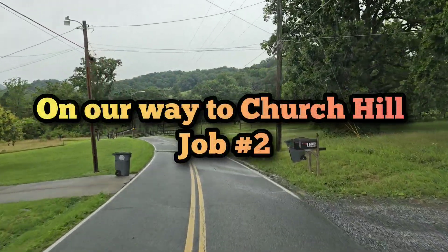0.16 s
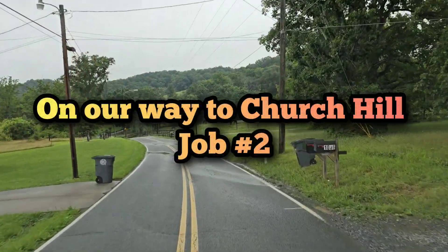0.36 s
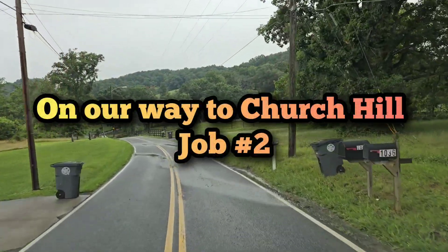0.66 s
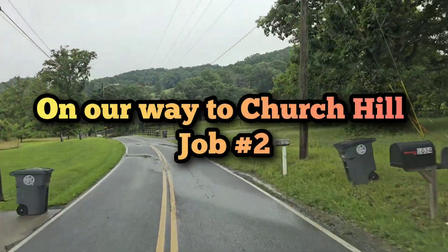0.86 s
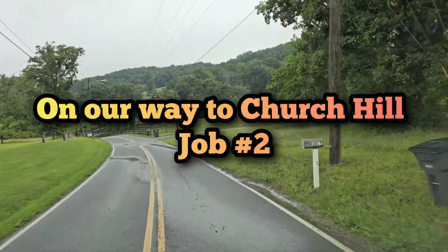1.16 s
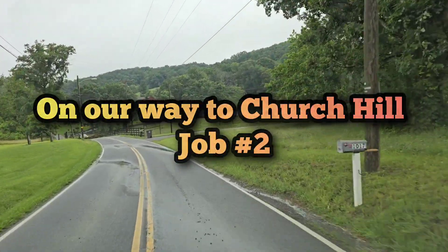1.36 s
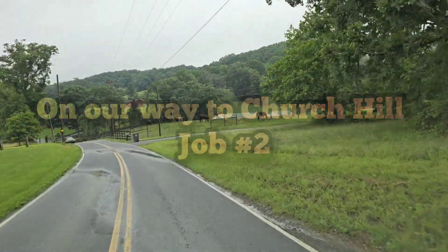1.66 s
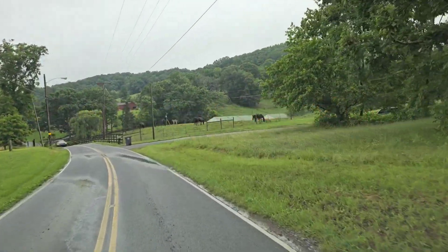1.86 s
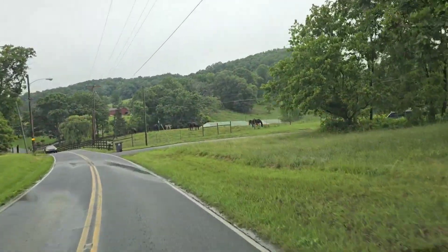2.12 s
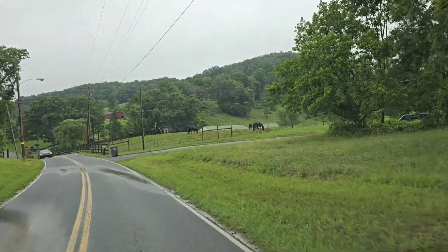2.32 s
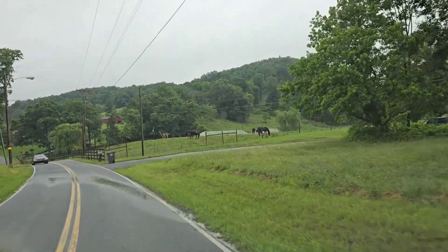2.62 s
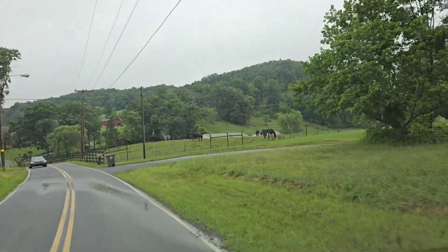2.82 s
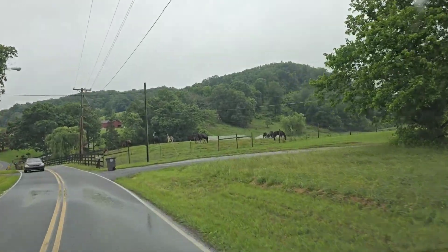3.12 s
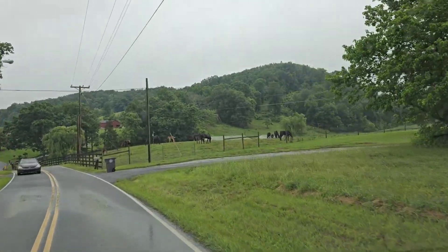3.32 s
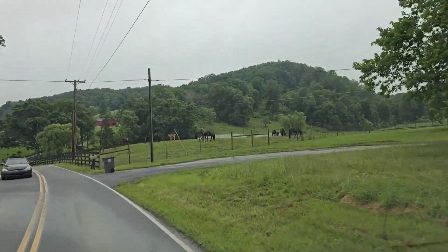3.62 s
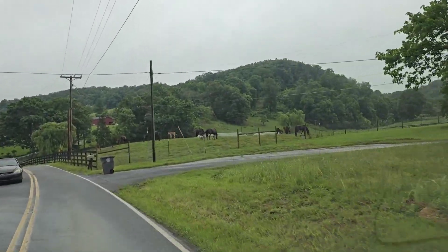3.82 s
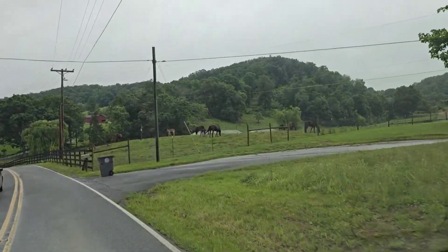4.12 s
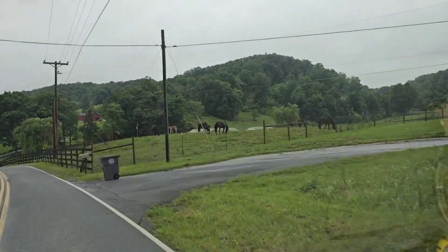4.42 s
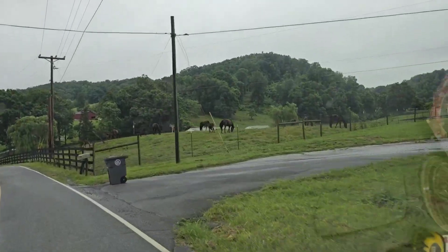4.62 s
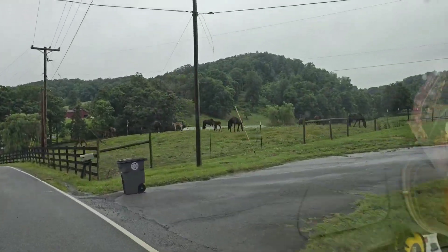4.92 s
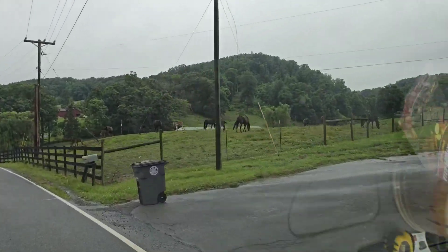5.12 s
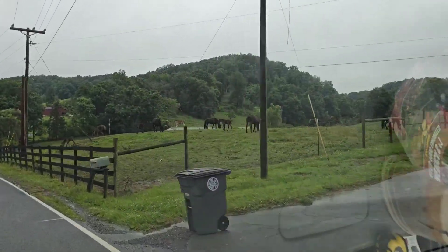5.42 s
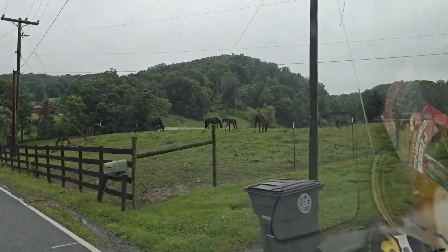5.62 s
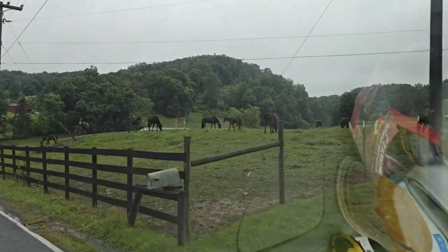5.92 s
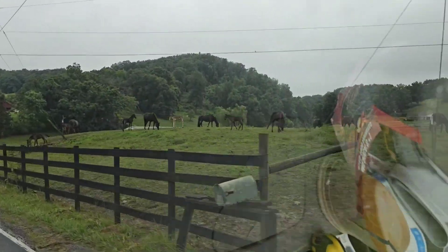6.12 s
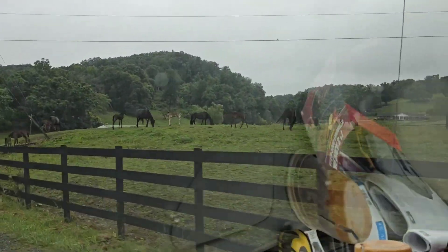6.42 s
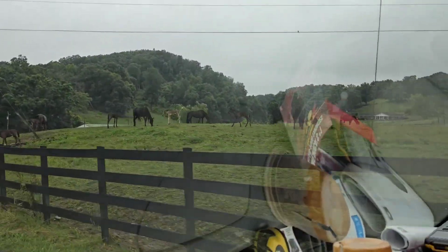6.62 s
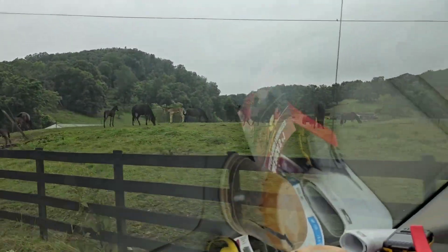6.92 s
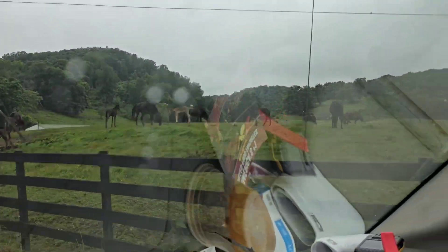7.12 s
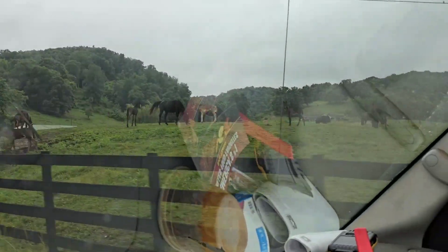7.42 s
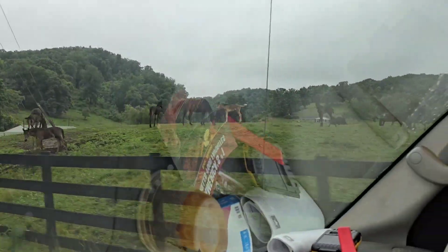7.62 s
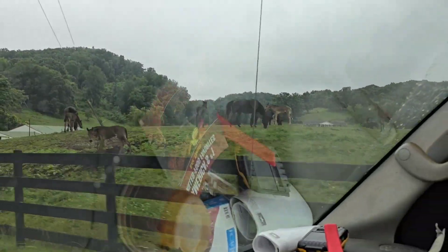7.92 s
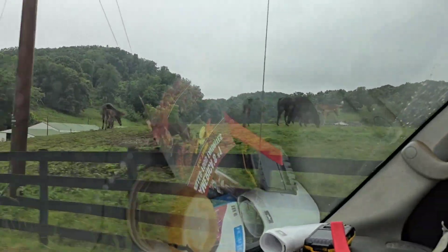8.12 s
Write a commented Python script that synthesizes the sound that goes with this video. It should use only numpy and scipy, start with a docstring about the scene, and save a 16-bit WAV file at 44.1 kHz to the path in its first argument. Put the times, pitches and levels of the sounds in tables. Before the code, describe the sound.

Inside a work truck on a damp road, a very deep boom and steady tyre rumble fill the cab. Bumps come thick at first, with a hard knock and rattle around one second. The middle is calmer, with wet tyre hiss swelling. Ticks return later, then another heavy jolt with knocks near seven seconds. The microphone is close, inside the cab, turning toward the side window.

```python
"""A deep boom fills the cab of a work truck rolling along a damp country road, swelling at each bump.
The tyres rumble and roar through the floor and hiss over wet patches: all are shaped noise.
Loose gear and trim knock, tick, clack, rattle and squeak: noise with quick fades or narrow pitches.
The hollow dashboard answers hard landings with short, fading sine tones."""
import sys
import numpy as np
from scipy import signal
from scipy.fft import rfft, irfft
from scipy.io import wavfile
from scipy.ndimage import uniform_filter1d

SR = 44100
rng = np.random.default_rng(int(sys.argv[2]) if len(sys.argv) > 2 else 0)


def unload_wav(signal):
    """Save mono or channel-first audio to the path in sys.argv[1] as 16-bit WAV at rate SR, clipped to [-1, 1]."""
    wavfile.write(
        sys.argv[1],
        SR,
        np.round(np.clip(np.atleast_2d(signal).T, -1, 1) * 32767).astype(np.int16),
    )


N = 364266
TIME = np.arange(N) / SR
FREQS = np.maximum(np.fft.rfftfreq(N, 1 / SR), 1)   # Hz, kept above zero

# The wheels meet a bump or dip; each layer later shifts its own level.
# Each row: time of the height in seconds, boom level in dB, floor thud level in dB, length in seconds.
BUMPS = [(0.048, -14, -28, 0.054), (0.163, -12, -27, 0.027), (0.265, -8, -25, 0.026),
         (0.434, -11.5, -29, 0.1), (0.567, -10, -29, .04), (0.639, -10, -27, 0.046),
         (0.73, -7.5, -23.5, 0.059), (0.983, -5.5, -22, 0.068), (1.086, -5.5, -29, 0.045),
         (1.183, -8.5, -27, 0.12), (1.732, -14, -25, 0.029), (1.814, -15, -42, 0.022),
         (1.905, -11.5, -35, 0.026), (2.117, -7.5, -30.5, 0.049), (2.208, -11.5, -36, 0.04),
         (2.343, -11, -41, 0.052), (2.558, -18, -30, 0.14), (2.666, -19, -35, 0.034),
         (3.446, -17, -49, 0.027), (3.538, -15.5, -25.5, 0.022), (3.66, -14.5, -33.5, 0.08),
         (4.658, -18, -31, 0.037), (4.956, -16, -42, 0.1), (5.286, -17.5, -37, 0.053),
         (5.757, -9.5, -29, 0.04), (6.081, -13, -31, 0.021), (6.562, -12.5, -26.5, 0.023),
         (6.65, -11, -29, 0.025), (6.761, -13, -35, 0.029), (6.862, -14.5, -28, 0.057),
         (6.954, -1.5, -37, 0.028), (7.091, -6, -43, 0.022), (7.22, -9.5, -24, 0.037),
         (7.437, -15, -36, 0.088), (7.605, -18, -32, 0.059), (7.918, -13.5, -44, 0.026)]
# The microphone swings from the road ahead to the side window.
# Each row: time in seconds, left minus right in dB in the midrange.
HEADING = [(0.0, -5), (4.3, -5.5), (5.9, -1), (8.26, -0.5)]


def from_db(db):
    """Turn decibels into gain."""
    return 10 ** (np.asarray(db) / 20)


def rms_one(x):
    """Scale a sound to an average power of 1."""
    return x / np.sqrt(np.mean(x ** 2) + 1e-20)


def in_time(rows):
    """Draw straight lines between the rows and read each column at every sample."""
    s, *columns = np.transpose(rows)
    return [np.interp(TIME, s, column) for column in columns]


def over_hz(points):
    """Read a curve at every frequency, joining its points on a log pitch axis."""
    hz, value = np.transpose(points)
    return np.interp(np.log(FREQS), np.log(hz), value)


def colour(points):
    """Gain of a tone colour that falls away steeply beyond its end points."""
    skirts = np.minimum(FREQS / points[0][0], 1) * np.minimum(points[-1][0] / FREQS, 1)
    return from_db(over_hz(points)) * skirts ** 2


def resonance(hz, width_hz):
    """Gain of a resonance: 1 at its pitch, about half at the edges of its width."""
    return 1 / (1 + ((FREQS ** 2 - hz ** 2) / (FREQS * width_hz)) ** 2)


def lifted(modes):
    """Gain of a flat response with resonances standing out of it."""
    return 1 + sum((from_db(db) - 1) * resonance(hz, width) for hz, width, db in modes)


def filtered(x, gain):
    """Apply a gain to every frequency of a sound."""
    return irfft(rfft(x) * gain, N)


def drift(rate_hz):
    """Random wandering with a spread of 1, smooth above the given rate."""
    return rms_one(filtered(rng.standard_normal(N), 1 / (1 + (FREQS / rate_hz) ** 2)))


def swells(rows):
    """Smooth rises and falls (middle in s, dB, length in s), added in power."""
    power = 0
    for s, db, length in rows:
        distance = (2 * (TIME - s) / length) ** 2
        power = power + from_db(2 * db) * np.exp(-np.minimum(distance, 20))
    return np.sqrt(power)


def pan(left_db):
    """Gains of the two channels for a given left minus right in dB."""
    return from_db(np.array([[1], [-1]]) * left_db / 2)


def cab_noise(gain):
    """Noise filling the cab: long waves reach both sides alike, short ones do not."""
    # Likeness of left and right. Each row: frequency in Hz, correlation from -1 to 1.
    likeness = [(25, .997), (45, .997), (70, .98), (160, .96), (270, .82), (450, .62), (740, .14),
                (1220, -.2), (2000, -.03), (15000, 0)]
    alike = np.clip(over_hz(likeness), -1, 1)
    mid, side = rfft(rng.standard_normal((2, N))) * gain
    mid, side = mid * np.sqrt(1 + alike), side * np.sqrt(1 - alike)
    return rms_one(irfft(np.array([mid + side, mid - side]), N))


def steadied(x, span_s):
    """Even out the chance swells of a narrow noise."""
    power = uniform_filter1d(np.mean(x ** 2, axis=0), max(int(span_s * SR), 1), mode="wrap")
    return x / np.sqrt(power + 1e-6)


def boom(bump_db, left_db, top_hz):
    """Engine and suspension shake the lowest modes of the cab; above top_hz little remains."""
    # Unevenness between bumps. Each row: time in seconds, boom level in dB around which it sways.
    ride_rows = [(0.0, -19), (1.2, -24.5), (1.35, -16), (1.55, -27), (1.9, -24.5), (2.4, -21),
                 (2.85, -20.5), (3.1, -23.5), (3.95, -24.5), (4.4, -24), (4.8, -21.5), (5.5, -22),
                 (6.0, -23), (6.45, -27.5), (6.7, -22), (7.2, -18.5), (7.7, -25.5), (8.1, -18.5)]
    # Air and body modes of the cab. Each row: pitch in Hz, width in Hz, relative level in dB.
    cab_modes = [(18.9, 17, -21.5), (32.8, 7.2, -5), (41, 4.4, -5), (47.8, 23.7, -11.5)]
    ride_db, = in_time(ride_rows)
    ride = from_db(ride_db + 2.5 * drift(rate_hz=6))   # chance sway with a spread of 2.5 dB
    jolts = swells((s, db + bump_db, length) for s, db, _, length in BUMPS)
    modes = sum(from_db(db) * resonance(hz, width) for hz, width, db in cab_modes)
    shaken = np.hypot(ride, jolts) * steadied(cab_noise(modes), span_s=.08)
    inertia = 1 / np.sqrt(1 + (FREQS / top_hz) ** 10)
    return filtered(shaken, inertia) * pan(left_db)


def road(rumble_db, roar_db, flutter_db, thud_db, thud_hz):
    """Road texture rumbles through the floor and roars higher from the tread; bumps add deeper thuds."""
    # Roughness. Each row: time in seconds, floor rumble in dB, tread roar in dB (shifted below).
    roughness = [(0.0, -28, -42.5), (0.76, -30.5, -42.5), (1.1, -23.5, -40), (1.27, -28.5, -44),
                 (1.59, -29.5, -44.5), (2.14, -29.5, -44.5), (3.11, -33, -47.5), (3.55, -35, -45.5),
                 (4.6, -33.5, -46.5), (4.9, -31, -43), (5.38, -34.5, -44.5), (5.89, -31, -42),
                 (6.33, -30, -42.5), (6.8, -30.5, -43), (7.13, -27, -39.5), (7.52, -32, -44),
                 (8.26, -34, -43.5)]
    # Tone colours. Each row: frequency in Hz, relative level in dB per Hz.
    rumble_colour = [(42, -19), (58, 1), (74, 0), (88, -2.5), (96, -5.5), (130, -12), (150, -9),
                     (205, -13.5), (238, -10.5), (275, -15), (330, -31.5), (520, -43.5)]
    roar_colour = [(200, -3), (310, 2.5), (400, -0.5), (490, -2.5), (620, -7), (780, -6), (870, -10.5),
                   (1000, -12.5), (1400, -13.5), (2200, -23.5), (5000, -43)]
    floor_db, tread_db = in_time(roughness)
    floor_gain = colour(rumble_colour)
    rumble = from_db(floor_db + rumble_db) * steadied(cab_noise(floor_gain), span_s=.12)
    roar = from_db(tread_db + roar_db) * cab_noise(colour(roar_colour))
    jolts = swells((s, db + thud_db, length) for s, _, db, length in BUMPS)
    deeper = floor_gain / np.hypot(1, FREQS / thud_hz)
    thuds = jolts * steadied(cab_noise(deeper), span_s=0.062)
    flutter = from_db(flutter_db * drift(rate_hz=6.5))
    return flutter * (rumble * pan(left_db=0.5) + roar * pan(left_db=2.5)) + thuds


def wet_tyres(hiss_db, spray_db, puddle_db, splash_db, patter_db):
    """Water squeezed from the tread hisses, drops spray against the wheel arches; puddles swell both."""
    # Wetness. Each row: time in seconds, tyre hiss level in dB (shifted below).
    wetness = [(0.0, -60), (1.17, -64.5), (1.47, -65), (2.57, -58.5), (3.26, -64.5), (3.86, -62),
               (4.3, -56.5), (5.06, -58), (6.1, -60.5), (6.74, -63), (6.83, -64.5), (7.55, -64.5),
               (8.26, -60.5)]
    # Wetter patches. Each row: middle in seconds, level in dB (shifted below), length in seconds.
    puddle_rows = [(.27, -48, 0.11), (2.0, -48, 0.17), (2.5, -48.5, 0.19), (5.0, -43.5, 0.25)]
    # Tone colours. Each row: frequency in Hz, relative level in dB per Hz.
    hiss_colour = [(500, -7.5), (1000, -3.5), (2000, -1.5), (2650, -2.5), (3200, -1), (4600, -4),
                   (5800, -13.5), (8000, -23), (16000, -37)]
    spray_colour = [(3000, -1), (5500, -4.5), (7200, 1), (10000, -2.5), (11100, -2), (11800, 4),
                    (12800, -0.5), (15800, 1.5)]
    wet_db, = in_time(wetness)
    puddles = swells(puddle_rows)
    hiss_level = np.hypot(from_db(wet_db + hiss_db), from_db(puddle_db) * puddles)
    spray_level = np.hypot(from_db(wet_db + spray_db), from_db(splash_db) * puddles)
    hiss = hiss_level * cab_noise(colour(hiss_colour)) * pan(left_db=-1.5)
    spray = spray_level * cab_noise(colour(spray_colour))
    return (hiss + spray) * from_db(patter_db * drift(rate_hz=28))


def random_contacts(per_s, range_db, fade):
    """Contacts at chance moments, up to range_db weaker than the strongest; fade is kept per sample."""
    chance, size = rng.random((2, N))
    contacts = (chance < per_s / SR) * from_db(-range_db * size)
    return signal.lfilter([1], [1, -fade], contacts + 1e-18)


def rattle(size_db):
    """Small things jiggle on the dashboard: quick uneven contacts of very different strength."""
    # Each row: time of the height in seconds, level in dB, length in seconds.
    rattle_rows = [(.45, -66, 0.88), (.99, -40, 0.098), (1.13, -42, 0.15), (6.78, -45, 0.14),
                   (7.115, -42.5, 0.16), (7.33, -46, 0.26)]
    # Tone colour. Each row: frequency in Hz, relative level in dB.
    rattle_colour = [(1000, 2), (2100, 1), (3800, 2), (5200, -10), (6500, -19), (10000, -13), (12000, -7),
                     (15800, -12)]
    fade = from_db(-60 / (.06 * SR))   # each contact falls by 60 dB in 0.06 s
    rings = random_contacts(130, size_db, fade)
    return swells(rattle_rows) * rings * cab_noise(colour(rattle_colour)) * pan(left_db=-4.0)


def chatter(grain):
    """A landing breaks up into uneven contacts; grain is the share of power in them."""
    contact_s = .0018   # time in which a contact fades to about a third
    bursts = rms_one(random_contacts(330, 10, np.exp(-1 / (contact_s * SR))))
    share = np.clip(grain, 0, 1)
    return np.sqrt(1 - share + share * bursts ** 2)


def blows(rows, gain, crack_db, grain):
    """A loose part lands with a brief crack and chatters; its dense modes die away in the cab."""
    rise_share, crack_s = .014, .003   # build-up as a share of ring time; crack fade in seconds
    envelope = np.zeros((2, N))
    for s, db, t60, left_db in rows:
        start = int(s * SR)
        age = np.maximum(TIME[start:][:SR] - s, 0)
        rise = 1 - np.exp(-age / (rise_share * t60))   # short rings build up fastest
        crack = from_db(crack_db) * np.exp(-age / crack_s)
        fading = from_db(db - 60 * age / t60)
        envelope[:, start:][:, :SR] += fading * (rise + crack) * pan(left_db)
    return envelope * chatter(grain) * cab_noise(gain)


def thumps(level_db):
    """Body panels thump dully: fading low noise without separate contacts."""
    # Each row: start in seconds, level in dB before level_db, time to fade by 60 dB in seconds,
    # left minus right in dB.
    thump_rows = [(.045, -36, 0.2, 2), (.185, -37, 0.32, -1), (.468, -35, 0.26, 1), (1.016, -28, 0.22, -1),
                  (1.160, -35, 0.16, -1), (1.53, -45, 0.2, 4), (3.56, -43.5, 0.35, 1), (5.0, -38, .2, 1),
                  (7.142, -38, 0.1, 1)]
    # Tone colour. Each row: frequency in Hz, relative level in dB.
    thump_colour = [(220, -5.5), (420, 1), (530, -5), (660, -9), (780, -7), (950, -36)]
    return blows(thump_rows, colour(thump_colour), crack_db=-16, grain=0) * from_db(level_db)


def squeaks(level_db, slip_db):
    """Plastic trim rubs: uneven slips excite one narrow resonance for the length of each rub."""
    # Each row: start in seconds, level in dB before level_db, length in seconds, pitch in Hz,
    # width in Hz, left minus right in dB.
    squeak_rows = [(0.223, -47.5, 0.035, 11750, 600, -10), (0.242, -49.5, 0.036, 7150, 300, 3),
                   (0.465, -42, 0.025, 3170, 1100, -3), (.834, -50, .02, 13200, 400, -9),
                   (1.075, -45, 0.046, 3680, 700, -1), (1.130, -50, 0.054, 3400, 800, -3),
                   (1.200, -51, .095, 4900, 300, 0), (1.226, -43, 0.053, 2490, 480, 1),
                   (1.234, -53, 0.018, 7100, 500, 2), (1.237, -50, .018, 4930, 320, -1),
                   (2.117, -48, .11, 14000, 600, 1), (4.835, -46, 0.037, 944, 120, 4),
                   (5.008, -43, 0.042, 860, 260, 13), (5.489, -41, .13, 13980, 260, -1),
                   (6.400, -60, 0.13, 14000, 260, 1), (6.512, -50, 0.074, 14100, 260, 1),
                   (6.870, -59, 0.13, 13800, 250, -1), (7.057, -40, .055, 1230, 200, 5),
                   (7.477, -55, .025, 7000, 600, 0)]
    out = np.zeros((2, N))
    slips = from_db(slip_db * drift(rate_hz=19))
    for s, db, length, hz, width, left_db in squeak_rows:
        start, count = int(s * SR), int(length * SR)
        edges = np.clip([hz - width / 2, hz + width / 2], 20, .45 * SR)
        band = signal.butter(2, edges, "band", fs=SR, output="sos")
        noise = signal.sosfilt(band, rng.standard_normal((2, SR)))
        rub = rms_one(noise[:, -count:])   # the end, where the filter has settled
        arch = np.sin(np.linspace(0, np.pi, count))
        out[:, start:start + count] += from_db(db + level_db) * rub * arch * pan(left_db)
    return out * slips


def ticks(level_db):
    """Small hard parts tick: bright fading noise with a strong first crack."""
    # Each row: start in seconds, level in dB before level_db, time to fade by 60 dB in seconds,
    # left minus right in dB.
    tick_rows = [(.436, -43.5, 0.13, -6), (.553, -37, 0.17, -4), (.702, -45, .02, -5),
                 (.730, -43, 0.023, -3), (1.020, -32, 0.24, -5), (1.102, -47, 0.25, -4),
                 (1.168, -55, 0.1, -4), (1.397, -47, 0.012, -13), (2.005, -41, 0.26, -3),
                 (5.463, -38, 0.2, -2), (5.597, -39.5, 0.13, -2), (5.660, -39, 0.23, -2),
                 (5.736, -40, 0.2, -2), (6.556, -37.5, 0.19, -1), (6.615, -41, 0.23, -2),
                 (6.684, -37, 0.27, 1), (6.750, -44, 0.28, 0), (6.786, -44, 0.37, -1),
                 (7.063, -44, 0.067, -6), (7.141, -40, 0.18, -13), (7.300, -57, .06, -2),
                 (8.057, -42, 0.16, -1), (8.125, -38, 0.17, -1)]
    # Tone colour. Each row: frequency in Hz, relative level in dB.
    tick_colour = [(1500, 4.5), (3500, -7), (5800, -7.5), (8300, -4), (11000, -1.5), (12200, 6.5),
                   (14000, 0), (15800, 8.5)]
    return blows(tick_rows, colour(tick_colour), crack_db=-1, grain=.08) * from_db(level_db)


def clacks(level_db):
    """Dull plastic clacks: fading midrange noise with a weak first crack."""
    # Each row: start in seconds, level in dB before level_db, time to fade by 60 dB in seconds,
    # left minus right in dB.
    clack_rows = [(.468, -61, 0.13, -3), (.702, -47, .025, -5), (.730, -46, 0.032, -8),
                  (.955, -56, 0.06, -2), (1.165, -49, .08, -5), (1.206, -47.5, 0.2, -2),
                  (1.397, -47.5, 0.028, -12), (6.580, -46, 0.22, 0), (6.845, -49.5, 0.14, -1),
                  (7.005, -52, 0.87, 3), (7.243, -48, 0.12, 2), (7.283, -50.5, 0.13, 3),
                  (7.768, -43, 0.25, 0)]
    # Tone colour. Each row: frequency in Hz, relative level in dB.
    clack_colour = [(400, 2), (900, 9), (1500, 11.5), (3200, 1), (4800, -3), (6500, -13), (9000, -27),
                    (15000, -28)]
    return blows(clack_rows, colour(clack_colour), crack_db=-14, grain=.15) * from_db(level_db)


def hollow_dashboard(contact_s):
    """The hollow dashboard rings as a fading sine, at a pitch set by where it is struck."""
    # Each row: start in seconds, level in dB, pitch in Hz, time to fade by 60 dB in seconds,
    # left minus right in dB.
    hollow_rows = [(1.017, -20, 500, .075, 2), (4.742, -32, 417, 0.071, 2), (5.106, -22.5, 426, 0.059, -1),
                   (7.065, -25, 580, .06, 1), (7.141, -20, 549, .04, 3), (7.164, -20, 475, 0.058, 4)]
    out = np.zeros((2, N))
    for s, db, hz, t60, left_db in hollow_rows:
        start = int(s * SR)
        age = np.maximum(TIME[start:][:SR] - s, 0)
        ring = from_db(db - 60 * age / t60) * np.sin(2 * np.pi * hz * age)
        out[:, start:][:, :SR] += ring * (1 - np.exp(-age / contact_s)) * pan(left_db)
    return out


def knocks(level_db):
    """Heavy gear jumps and lands: fading noise that brings out the modes of the dashboard panels."""
    # Each row: start in seconds, level in dB before level_db, time to fade by 60 dB in seconds,
    # left minus right in dB.
    knock_rows = [(1.018, -25, 0.18, 0.5), (1.062, -43, 0.12, 0), (1.102, -36, 0.12, 0),
                  (1.165, -56, 0.059, -2), (7.065, -33.5, 0.18, 2), (7.141, -25.5, 0.17, 2)]
    # Tone colour. Each row: frequency in Hz, relative level in dB.
    knock_colour = [(150, -4), (370, 4), (520, 3), (700, 0), (1300, -3), (2100, 1), (4000, -6),
                    (5200, -11.5), (6500, -15), (10300, -38), (11900, -6), (13000, -26), (15800, -9)]
    # Panels of the dashboard. Each row: pitch in Hz, width in Hz, lift in dB.
    panel_modes = [(510, 35, 12), (600, 39, 6), (800, 38, 8), (1230, 62, 6), (1584, 170, 3.5),
                   (2040, 86, 5.5), (2180, 40, 3), (2970, 73, 2), (3950, 180, 5.5), (5080, 92, 12.5),
                   (7130, 190, 13)]
    gain = colour(knock_colour) * lifted(panel_modes)
    return blows(knock_rows, gain, crack_db=-7, grain=0.2) * from_db(level_db)


def standing_waves(x):
    """Sound bouncing between glass, roof and seats grows stronger at certain pitches."""
    # Each row: pitch in Hz, width in Hz, lift in dB.
    wave_modes = [(152.4, 9.8, 4), (200, 32, 3.5), (235, 13.4, 3), (433, 31, 3), (805, 106, 2.5),
                  (961, 52, 7), (1203, 164, 5), (1470, 98, 3), (2000, 550, 3.5), (3120, 130, 2)]
    return filtered(x, lifted(wave_modes))


def turned(x, middle_hz, width_hz):
    """As the microphone turns, the midrange of the road noise moves from the right toward the centre."""
    left_db, = in_time(HEADING)
    return x + filtered(x, resonance(middle_hz, width_hz)) * (pan(left_db) - 1)


def reflected(x, echo_db, t60_s, count):
    """Glass and doors return short waves as quick echoes, different ones on each side."""
    response = np.zeros((2, N))
    for side in response:
        delays = rng.uniform(.002, t60_s / 2, count)   # seconds
        signs = rng.choice([-1, 1], count)
        side[(delays * SR).astype(int)] = signs * from_db(echo_db - 60 * delays / t60_s)
    short_waves = FREQS ** 2 / (FREQS ** 2 + 400 ** 2)
    return filtered(x, 1 + rfft(response) * short_waves)


def cab_echoes(x):
    """The pattern of echoes changes as the microphone swings toward the side window."""
    heading, = in_time(HEADING)
    swung = (heading - heading.min()) / (np.ptp(heading) + 1e-9)   # 0 ahead, 1 aside
    ahead = reflected(x, echo_db=-16, t60_s=.09, count=28)
    aside = reflected(x, echo_db=-16, t60_s=.09, count=28)
    return (1 - swung) * ahead + swung * aside


def scene():
    """Add up the ride and the gear that it shakes."""
    deep = boom(bump_db=-1.0, left_db=-1.0, top_hz=50.6)
    rolling = road(rumble_db=0.43, roar_db=2.0, flutter_db=1.12, thud_db=-1.5, thud_hz=148)
    rolling = rolling + wet_tyres(hiss_db=10.0, spray_db=6.0, puddle_db=-2.0, splash_db=-6.5, patter_db=0.89)
    rolling = turned(standing_waves(rolling), middle_hz=1260, width_hz=670)
    gear = rattle(size_db=18.0) + thumps(level_db=5.5) + ticks(level_db=3.5) + clacks(level_db=9.0)
    gear = gear + hollow_dashboard(contact_s=0.0024) + knocks(level_db=0.5)
    trim = reflected(squeaks(level_db=-1.5, slip_db=1.0), echo_db=-13.0, t60_s=0.15, count=60)
    return deep + cab_echoes(rolling + gear) + trim


def record(dry):
    """The microphone's two ports differ in bass phase; the extremes are cut and peaks rounded."""
    ports = np.exp(1j * np.arctan(15 / FREQS) * [[0], [1]])
    low_cut = 1 / np.sqrt(1 + (15 / FREQS) ** 8)   # below 15 Hz
    picked_up = filtered(dry, ports * low_cut)
    rounded = picked_up / (1 + (picked_up / .85) ** 6) ** (1 / 6)   # stays below 0.85
    top_cut = 1 / np.sqrt(1 + (FREQS / 15850) ** 400)   # very steep, above 15850 Hz
    return filtered(rounded, top_cut)


dry = scene()
out = record(dry)
unload_wav(out)
```